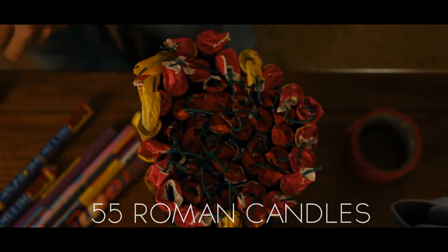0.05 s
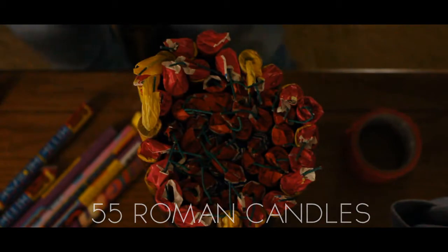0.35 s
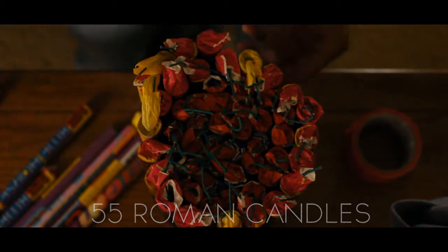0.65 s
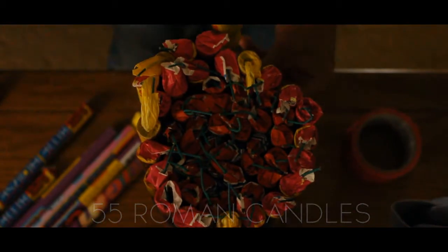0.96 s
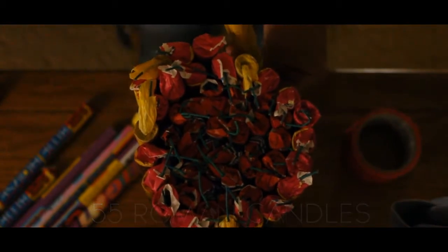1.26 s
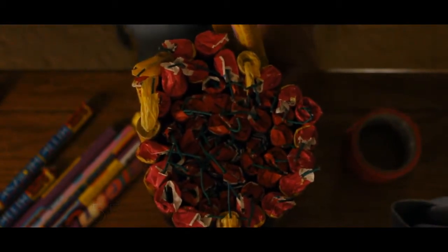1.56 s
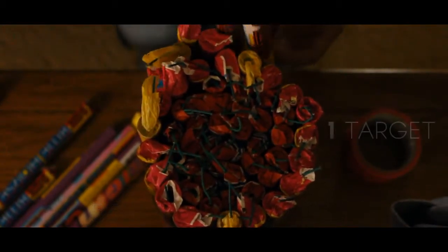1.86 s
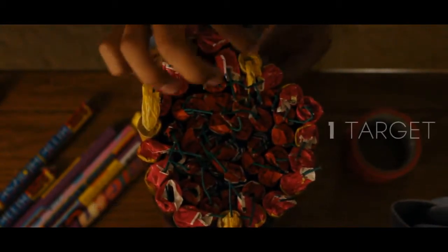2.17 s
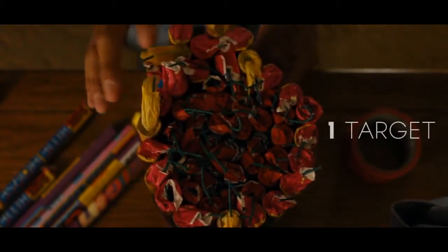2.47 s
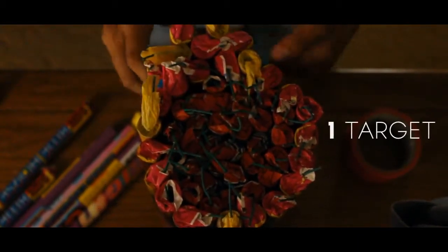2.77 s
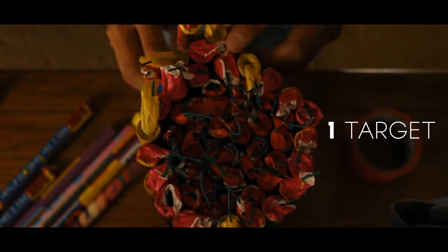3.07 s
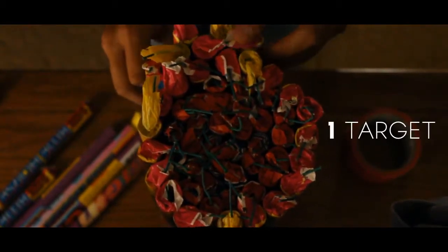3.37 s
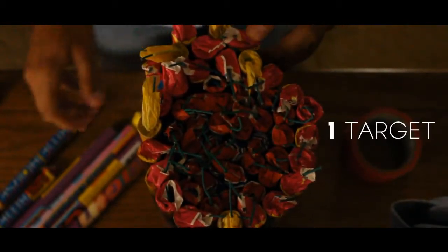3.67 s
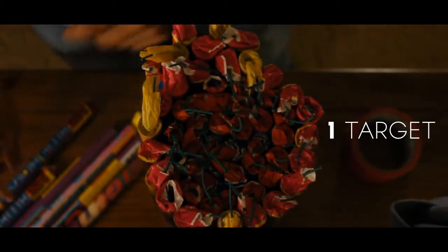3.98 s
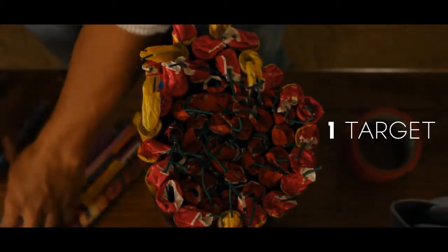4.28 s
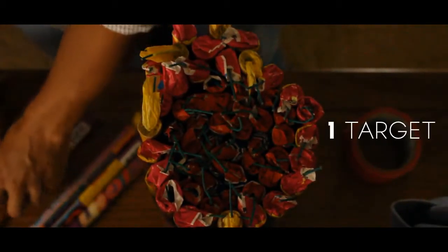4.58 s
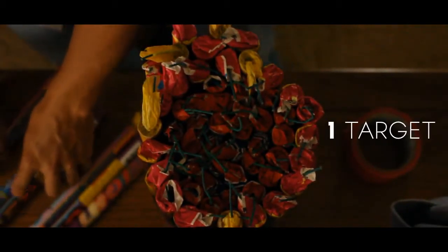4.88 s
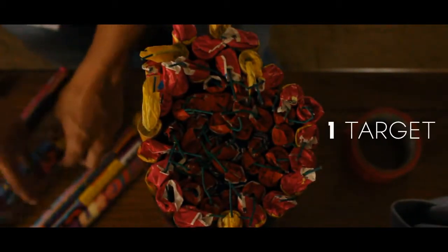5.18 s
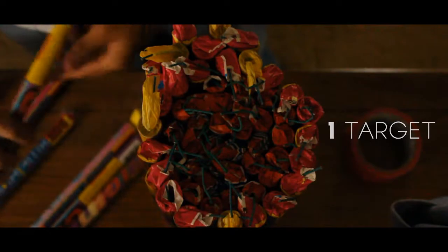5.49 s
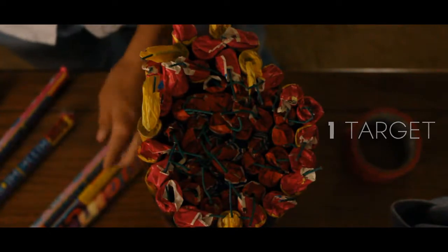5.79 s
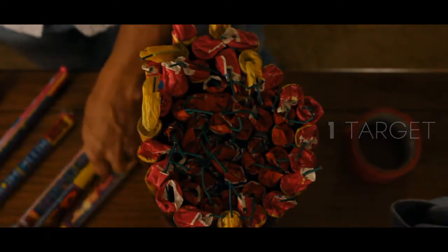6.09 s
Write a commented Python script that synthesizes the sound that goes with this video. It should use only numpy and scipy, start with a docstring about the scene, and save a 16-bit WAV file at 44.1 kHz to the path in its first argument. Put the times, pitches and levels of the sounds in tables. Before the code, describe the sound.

For the first two seconds, paper wrappers crinkle and tick faintly as hands move over a taped bundle of cardboard tubes. A sharp snap comes at about 2 seconds, and the rustling grows. At about 2.6 seconds the bundle lands on a wooden table with a loud, rattling knock that briefly overloads the microphone. A duller bump follows at 3.3 seconds and another firm one at 3.7, with crinkles, snaps and a light clack between them. From about 4.2 seconds loose tubes slide over the wood with a soft low rumble and brushing paper, giving short rough judders, clearest near 5.1 seconds. Tubes clack together at 5.4 seconds. One more slide, with crinkling and a brief judder, comes around 6 seconds. The room is small, with short echoes and a faint steady hiss.

```python
"""Paper wrappers crinkle and snap as hands brush over a taped bundle of cardboard firework tubes.
Shifted on a wooden table in a small room, the bundle bumps down three times, ringing the table top,
the first time hard enough to overload the microphone. Then loose tubes are slid over the wood,
where they rumble, judder as they stick and slip, and clack together."""
import sys
import numpy as np
from scipy import signal
from scipy.fft import rfft, irfft
from scipy.io import wavfile
from scipy.ndimage import uniform_filter1d, map_coordinates

SR = 44100
rng = np.random.default_rng(int(sys.argv[2]) if len(sys.argv) > 2 else 0)


def store_pcm(level_fs):
    """Save levels as 16-bit WAV."""
    pcm = np.round(np.clip(level_fs, -1, 1) * 32767).astype(np.int16)
    wavfile.write(sys.argv[1], SR, np.atleast_2d(pcm).T)


N = 275184


def amp(db):
    """Decibels to gain."""
    return 10 ** (np.asarray(db) / 20)


def unit(x):
    """Scales to rms 1."""
    return x / np.sqrt(np.mean(x ** 2) + 1e-20)


def curve_at(points, hz):
    """Reads a curve on a log-frequency axis."""
    point_hz, value = np.transpose(points)
    return np.interp(np.log(hz + 1), np.log(point_hz + 1), value)


def add(mix, start_s, sound):
    """Mixes a sound in at its start time."""
    part = mix[max(round(start_s * SR), 0):][:len(sound)]
    part += sound[:len(part)]


def colour(x, eq, size=4096):
    """Minimum-phase EQ through points of frequency in Hz and gain in dB."""
    log_gain = np.log(amp(curve_at(eq, abs(np.fft.fftfreq(size, 1 / SR)))))
    taps = np.fft.ifft(np.exp(signal.hilbert(log_gain).conj())).real
    return signal.fftconvolve(x, taps[:size // 2])[:len(x)]


def soften(x, hz, order=2):
    """Low-pass: a soft contact excites little above hz."""
    return signal.lfilter(*signal.butter(order, min(hz, SR / 2 - 1), fs=SR), x)


def hump(x, hz, spread):
    """A broad resonance from hz / spread to hz * spread."""
    band_hz = [hz / spread, min(hz * spread, 0.45 * SR)]
    return signal.lfilter(*signal.butter(1, band_hz, 'band', fs=SR), x)


def wobble(size):
    """A random wobble of rms 1 that turns every size samples."""
    knots = np.arange(0, N + size, size)
    return unit(np.interp(np.arange(N), knots, rng.standard_normal(len(knots))))


def wander(x, patch_db, patch_s=0.09, patch_hz=600):
    """The colour drifts in patches as the contact moves on."""
    hz, t, spectrum = signal.stft(x, SR, nperseg=512)
    grid = np.meshgrid(hz / patch_hz, t / patch_s, indexing='ij')
    patches = unit(map_coordinates(rng.standard_normal(spectrum.shape), grid, order=1, mode='nearest'))
    return signal.istft(spectrum * amp(patch_db * patches), SR, nperseg=512)[1][:len(x)]


def slide_envelope(slides, layer=0, release_db=-14.5):
    """Each slide speeds up evenly, holds, then fades by release_db per release time; powers add."""
    t, power = np.arange(N) / SR, np.zeros(N)
    for start_s, rise_s, hold_s, release_s, *levels_db in slides:
        attack = np.clip((t - start_s) / rise_s, 0, 1)
        released = np.clip((t - start_s - rise_s - hold_s) / release_s, 0, 10)
        power += (attack * amp(levels_db[layer] + release_db * released)) ** 2
    return np.sqrt(power)


# The small room's decay. Each row: frequency in Hz, seconds to fall 60 dB.
ROOM_DECAY = [(70, 0.59), (200, 0.37), (450, 0.36), (1000, 0.34), (2500, 0.29), (6000, 0.24), (15000, 0.24)]


def reflections(early_s, early_db):
    """Dense echoes of energy 1: a strong early cluster, then a tail in which treble dies first."""
    taps = rng.choice([-1., 1.], SR) * (rng.random(SR) < 0.1)
    hz, t, bands = signal.stft(taps, SR, nperseg=256)
    cluster_db = early_db / (1 + (t / early_s) ** 8)
    decay_db = -60 * t / curve_at(ROOM_DECAY, hz)[:, None]
    tail = signal.istft(bands * amp(cluster_db + decay_db), SR, nperseg=256)[1][:SR]
    # so many paths add up that no band is favoured
    spectrum = rfft(tail, 2 * SR)
    band_power = uniform_filter1d(abs(spectrum) ** 2, size=64)
    tail = irfft(spectrum / np.sqrt(band_power + 1e-12))[:SR]
    return tail / np.linalg.norm(tail)


def in_room(x, wet_db):
    """A sound and its echoes off the walls."""
    return x + amp(wet_db) * signal.fftconvolve(x, reflections(early_s=0.026, early_db=4))[:N]


# The noise bed's tone. Each row: frequency in Hz, gain in dB.
AIR_EQ = [(10, -25.5), (30, -15.5), (60, -2), (140, -0.5), (250, -2), (500, -3.5), (1000, -5.5),
          (2000, -8.5), (4000, -12.5), (8000, -19.5), (16000, -22.5)]


def room_tone(level_db=-60.5):
    """A steady bed of quiet air and microphone hiss."""
    return amp(level_db) * unit(colour(rng.standard_normal(N + SR), AIR_EQ)[SR:])


# Wrappers crumpling under a finger. Each row: start in seconds, level in dB,
# seconds to fall 60 dB, centre in Hz.
WRAPPER_CRINKLES = [(.001, -48.5, 0.19, 4500), (0.201, -60.5, 0.27, 5000), (0.2629, -54, 0.16, 3480),
                    (0.453, -51.5, 0.25, 3000), (.52, -48.5, 0.27, 2960), (.714, -51.5, 0.083, 2940),
                    (0.7432, -44.5, 0.11, 4100), (1.046, -44.5, 0.13, 5940), (1.784, -39.5, 0.029, 7500),
                    (2.047, -42, 0.085, 7000), (2.365, -45, 0.13, 5916), (2.4932, -37, 0.42, 5500),
                    (2.556, -34, 0.18, 3857), (2.668, -47, 0.15, 6024), (3.26, -37, 0.27, 6570),
                    (3.683, -42.5, 0.21, 6800), (4.721, -55, .17, 2980), (6.046, -48.5, 0.089, 4500)]


def crinkles(grain_db=3.5, paper_top_hz=12500):
    """Each crinkle is a clump of tiny fibre breaks that dies away."""
    out, t = np.zeros(N), np.arange(SR // 4) / SR
    for start_s, db, t60, hz in WRAPPER_CRINKLES:
        grains = rng.standard_normal(len(t)) * amp(grain_db * wobble(size=30)[:len(t)])
        add(out, start_s, amp(db - 60 * t / t60) * unit(hump(grains, hz, spread=2.3)))
    return in_room(soften(out, paper_top_hz), wet_db=-14)


def crease_ticks(rest_db=-46, let_go_s=3.7, spread_db=14, tick_t60=0.0045):
    """Creases give way at random: faint under the resting hand, louder in strokes, where fibres prickle."""
    out, t = np.zeros(N), np.arange(SR // 50) / SR
    crack = rng.standard_normal(len(t)) * amp(-60 * t / tick_t60)
    resting = np.arange(N) < let_go_s * SR
    swish, hiss = (slide_envelope(PAPER_STROKES, layer) for layer in (0, 1))
    crease_force = amp(rest_db) * resting + amp(10) * swish
    fibre_force = amp(5) * (swish + hiss)
    for per_s, force, hz in (40, crease_force, 3800), (70, fibre_force, 10500):
        triggers = (rng.random(N) < per_s / SR) * amp(-spread_db * rng.random(N))
        tick = hump(crack, hz, spread=2)
        out += signal.fftconvolve(triggers * force, tick / abs(tick).max())[:N]
    return in_room(out, wet_db=-4)


# Sharp snaps of paper and tape. Each row: start in seconds, dry peak in dB, centre in Hz.
PAPER_SNAPS = [(0.2, -40, 4500), (0.2649, -38, 5000), (0.2754, -27.5, 2070), (0.293, -35, 3540),
               (0.4717, -29, 2580), (1.0194, -41.5, 5760), (1.3026, -37, 3210), (1.4316, -42.5, 2850),
               (1.5947, -39.5, 3300), (1.7848, -30.5, 6500), (2.0506, -26, 4800), (2.0581, -15, 3980),
               (2.2605, -29, 4394), (2.495, -30, 5260), (3.168, -31, 2300), (3.239, -29.5, 6300),
               (3.252, -25, 6460), (3.265, -25, 5220), (3.4196, -33.5, 4686), (3.5057, -26.5, 4450),
               (4.1951, -34.5, 3380), (4.7217, -26.5, 2970), (5.0784, -37, 3490), (5.415, -33, 8000),
               (6.0286, -34.5, 3200), (6.0531, -27, 3180)]


def snaps(tear_t60=0.0045, tear_gain=0.71):
    """A crease gives way with one sharp tick and a brief tearing of fibres."""
    out, t = np.zeros(N), np.arange(SR // 20) / SR
    for start_s, db, hz in PAPER_SNAPS:
        crack = tear_gain * rng.standard_normal(len(t)) * amp(-60 * t / tear_t60)
        crack[0] = 1
        snap = hump(crack, hz, spread=1.7)
        add(out, start_s, amp(db) * snap / abs(snap).max())
    return in_room(out, wet_db=-2)


# A hand, sleeve or tube brushing the wrappers. Each row: start, rise, hold and release in seconds,
# then relative levels of swish and hiss in dB.
PAPER_STROKES = [(.94, 0.034, 0.016, 0.025, -59, -61), (1.67, 0.094, .01, .04, -58, -59),
                 (1.783, 0.013, 0.31, 0.25, -52.5, -45.5), (1.86, 0.17, 0.029, 0.044, -46, -62),
                 (2.23, 0.058, 0.1, 0.065, -52.5, -56), (2.4, 0.012, 0.036, 0.24, -46.5, -46),
                 (2.845, 0.023, 0.19, .05, -62.5, -65.5), (3.07, 0.009, .04, 0.095, -54, -54),
                 (3.11, 0.017, .03, .03, -51, -68), (3.215, 0.075, 0.019, 0.061, -45.5, -50),
                 (3.413, 0.026, 0.085, .12, -49.5, -49.5), (3.638, .008, 0.025, .03, -55, -49),
                 (4.02, .05, 0.2, .08, -59, -83), (4.22, 0.098, 0.15, 0.3, -47.5, -46),
                 (4.35, 0.018, .015, 0.057, -38.5, -41), (4.44, 0.023, 0.048, 0.13, -42.5, -47.5),
                 (4.66, 0.027, 0.068, 0.031, -49, -56), (4.79, 0.045, 0.017, 0.095, -52.5, -53.5),
                 (4.965, 0.017, 0.13, 0.15, -47.5, -48), (5.27, 0.074, 0.076, 0.069, -55.5, -73),
                 (5.51, .02, .015, .03, -66, -59), (5.922, 0.0093, 0.13, 0.087, -53, -58.5),
                 (6.1, 0.019, 0.015, 0.064, -50, -48), (6.2, 0.029, .02, .05, -47, -53)]
# The mid-range swish and the fine hiss on top. Each row: frequency in Hz, gain in dB.
SWISH_EQ = [(150, -11), (500, -5.5), (1000, -3.5), (2400, 3.5), (4000, -2.5), (7000, -19), (16000, -22.5)]
HISS_EQ = [(1500, -22), (4000, -1.5), (6500, -1), (10000, -5), (15500, -7)]


def rustle(trim_db=-2, grain_db=2, clump_db=1.72):
    """Skin and cloth catch on paper fibres: dense grains, in clumps, as strong as the stroke."""
    out = np.zeros(N)
    catches = amp(grain_db * wobble(size=24) + clump_db * wobble(size=400))
    for layer, eq in enumerate((SWISH_EQ, HISS_EQ)):
        friction = colour(catches * rng.standard_normal(N), eq)
        out += unit(wander(friction, patch_db=2)) * slide_envelope(PAPER_STROKES, layer)
    return in_room(amp(trim_db) * out, wet_db=-13)


# Single tubes knocking together. Each row: start in seconds, relative level in dB,
# contact cutoff in Hz, chatter length in seconds.
TUBE_CLACKS = [(1.73, -33.5, 1210, 0.055), (2.060, -33, 4000, 0.0057), (3.079, -39.5, 997, .02),
               (3.167, -36.5, 2010, 0.0044), (3.449, -22, 930, 0.037), (5.414, -23, 3220, 0.0085),
               (5.423, -23.5, 2620, 0.011)]
# A tube's hollow ring. Each row: frequency in Hz, undamped bandwidth in Hz, relative level in dB.
TUBE_MODES = [(997, 110, -13), (1364, 74, -13), (1670, 37, -5.5), (2020, 85, -10), (2433, 50, -9),
              (3070, 24, -9), (3333, 39, -11)]
# The tick of the cardboard wall. Each row: frequency in Hz, gain in dB.
CARDBOARD_EQ = [(60, -37), (250, -20.5), (500, -0.5), (800, -2), (1800, -4.5), (3000, -4.5), (6000, 0),
                (15000, 13.5)]


def clacks(trim_db=-10, modes_db=-28, direct=0.29, grip_hz=45):
    """A light tube clacks with a few short modes, damped by the hand's grip, over the tick of its wall."""
    out, t = np.zeros(N), np.arange(SR) / SR
    modes = sum(amp(db) * np.exp(-np.pi * (width_hz + grip_hz) * t) * np.cos(2 * np.pi * hz * t)
                for hz, width_hz, db in TUBE_MODES)
    body = amp(modes_db) * modes + colour(signal.unit_impulse(SR), CARDBOARD_EQ)
    for start_s, db, cutoff_hz, chatter_s in TUBE_CLACKS:
        paths = reflections(early_s=chatter_s, early_db=12.5)
        paths[0] += direct
        clack = soften(signal.fftconvolve(paths, body)[:SR], cutoff_hz, order=3)
        loudest_rms = np.sqrt(uniform_filter1d(clack ** 2, 220, mode='constant').max())  # over 5 ms
        add(out, start_s, amp(db + trim_db) * clack / loudest_rms)
    return out


# The bundle or loose tubes sliding on the wood. Each row: start, rise, hold and release in seconds,
# relative level in dB.
WOOD_DRAGS = [(1.85, .06, 0.27, .08, -60.5), (2.04, 0.027, 0.033, .02, -53), (2.92, .02, .1, 0.097, -59.5),
              (3.068, 0.0061, 0.017, 0.055, -50.5), (3.48, 0.019, 0.021, 0.057, -48),
              (3.615, 0.018, 0.034, 0.036, -49.5), (4.23, 0.016, 0.015, .05, -42),
              (4.36, 0.041, 0.15, 0.15, -46), (4.64, .03, 0.25, .1, -63), (4.97, .02, 0.16, 0.23, -55),
              (5.33, .03, .05, .04, -59), (5.925, 0.011, .3, .05, -55)]
# The low rumble of a drag. Each row: frequency in Hz, gain in dB.
DRAG_EQ = [(30, -34), (70, -13), (110, -16.5), (160, -4), (240, 1), (330, -1), (450, -5.5), (700, -11.5),
           (1200, -22), (3000, -47.5)]


def drags(trim_db=-2, slips_per_s=900):
    """Sliding tubes make tiny random slips that rumble through the table top."""
    slips = rng.standard_normal(N) * (rng.random(N) < slips_per_s / SR)
    rumble = wander(colour(slips, DRAG_EQ), patch_db=3.5, patch_s=0.15, patch_hz=89)
    return amp(trim_db) * unit(rumble) * slide_envelope(WOOD_DRAGS)


# The bundle, a hand or a tube landing on the table. Each row: start in seconds,
# relative force in dB, contact cutoff in Hz.
TABLE_BUMPS = [(2.5626, 5, 1690), (2.569, -1, 2570), (2.589, -2.5, 1210), (2.613, -9.5, 1500),
               (2.668, -8.5, 805), (2.690, -6.5, 1068), (3.2643, -4.5, 483), (3.295, -10, 460),
               (3.6959, -1.5, 1200), (3.706, -5.5, 1233), (4.196, -24, 270), (4.212, -19.5, 273),
               (4.527, -28.5, 320), (5.414, -34, 768), (5.937, -42.5, 272)]
# The table top's ring under the bundle. Each row: frequency in Hz, relative level in dB.
TABLE_MODES = [(231.5, -33), (301.5, -27.5), (419.9, -31), (446.8, -34), (484.5, -34), (602.9, -35.5),
               (640.6, -33.5), (710.6, -32), (796.7, -36), (877.5, -35), (920.5, -38.5), (1023, -43.5),
               (1077, -39), (1174, -36), (1206, -32), (1254, -45.5), (1340, -52), (1497, -48.5),
               (1620, -51), (1793, -49.5), (1927, -59), (2099, -58.5), (2342, -57), (2439, -61)]
# The dense thud of table and room together. Each row: frequency in Hz, gain in dB.
THUD_EQ = [(25, -56), (50, -41.5), (75, -22), (105, -22.5), (150, -4.5), (200, -4.5), (300, 2.5),
           (450, 3.5), (560, -2), (900, -2), (1200, -4), (1550, -9.5), (3000, -12.5), (6000, -10.5),
           (16000, -23.5)]


def bumps(modes_db=14, thud_db=36, direct=0.39, low_cut_hz=55):
    """Each blow rings the table's modes and fills the room with a thud."""
    out, t = np.zeros(N), np.arange(SR) / SR
    hz, db = np.transpose(TABLE_MODES)[:, :, None]
    t60 = 0.84 * curve_at(ROOM_DECAY, hz)  # the wood dies about as fast as the room
    sign = (-1) ** np.arange(len(hz))[:, None]  # neighbouring modes swing in opposite directions
    modes = (sign * amp(db - 60 * t / t60) * np.sin(2 * np.pi * hz * t)).sum(0)
    for start_s, force_db, cutoff_hz in TABLE_BUMPS:
        paths = reflections(early_s=0.039, early_db=6.5)
        paths[0] -= direct
        ring = amp(modes_db) * modes + amp(thud_db) * colour(paths, THUD_EQ)
        add(out, start_s, amp(force_db) * soften(ring, cutoff_hz, order=3))
    # a low cut keeps deep bass out of the thuds
    return signal.lfilter(*signal.butter(2, low_cut_hz, 'high', fs=SR), out)


# A tube juddering on the wood. Each row: start in seconds, length in seconds, level in dB, pitch in Hz.
TUBE_JUDDERS = [(4.555, 0.061, -51.5, 609), (4.966, 0.081, -56.5, 671), (5.071, 0.05, -38, 678),
                (6.062, 0.123, -55.5, 614), (6.169, 0.059, -46.5, 564)]


def judders(jitter=0.061, octave_db=-17, grip_db=4):
    """A tube that sticks and slips almost evenly gives a short, rough groan."""
    out = np.zeros(N)
    for start_s, length_s, db, hz in TUBE_JUDDERS:
        count = round(length_s * SR)
        slip_hz = hz * (1 + jitter * wobble(size=70)[:count])
        phase = 2 * np.pi * np.cumsum(slip_hz) / SR
        grip = amp(grip_db * wobble(size=70)[:count])
        groan = grip * (np.sin(phase) + amp(octave_db) * np.sin(2 * phase))
        add(out, start_s, amp(db) * unit(groan) * signal.windows.tukey(count, 0.5))
    return out


def scene():
    """Air, paper, knocks and slides, mixed at one microphone."""
    air = room_tone()
    paper = crinkles() + crease_ticks() + snaps() + rustle()
    knocks = clacks() + bumps()
    slides = in_room(drags() + judders(), wet_db=-0.5)
    return (air + paper + knocks + slides)[None]


def record(dry, ceiling=0.81, top_hz=15900):
    """The overloaded input flattens the loudest peaks; a steep low-pass trims the top."""
    clipped = dry / (1 + (dry / ceiling) ** 12) ** (1 / 12)
    low_pass = signal.firwin(511, top_hz, window=("kaiser", 9), fs=SR)
    return signal.oaconvolve(clipped, low_pass[None], "same")


dry = scene()
out = record(dry)
store_pcm(out)
```